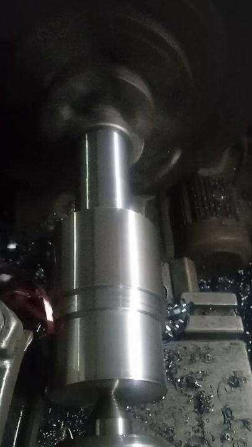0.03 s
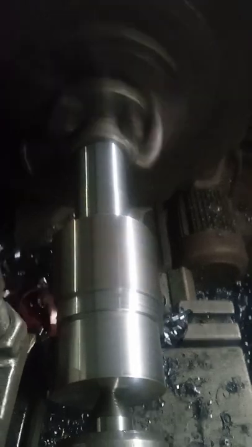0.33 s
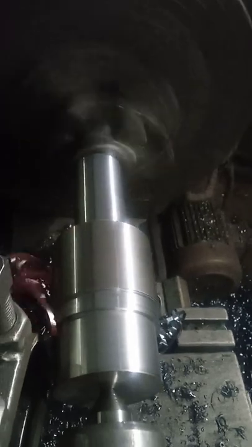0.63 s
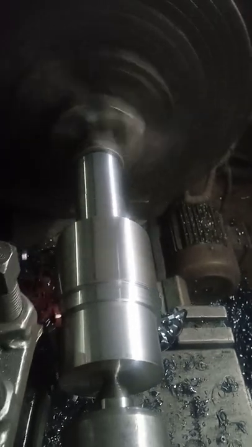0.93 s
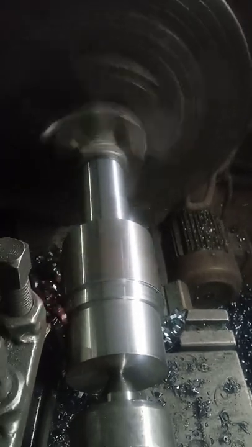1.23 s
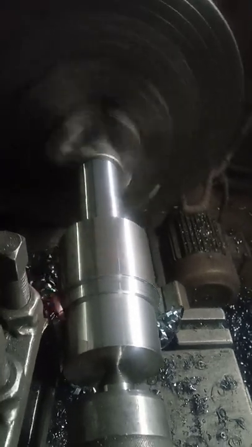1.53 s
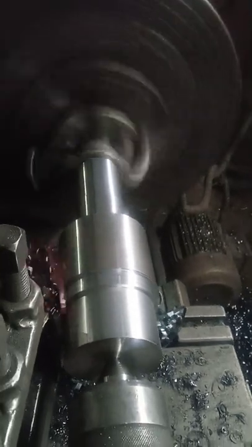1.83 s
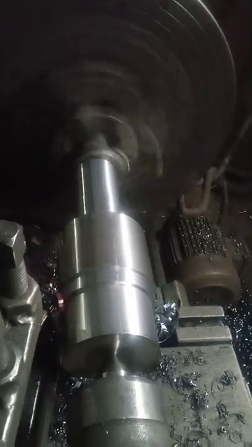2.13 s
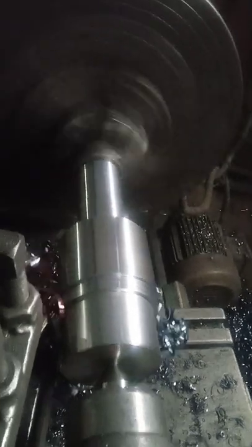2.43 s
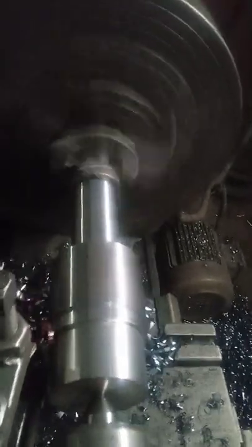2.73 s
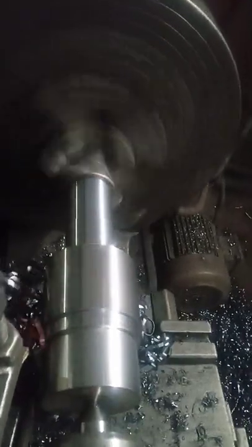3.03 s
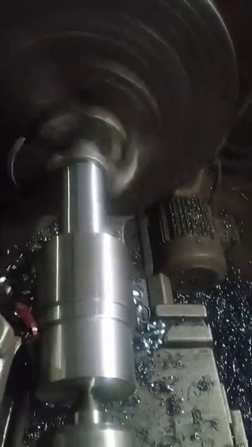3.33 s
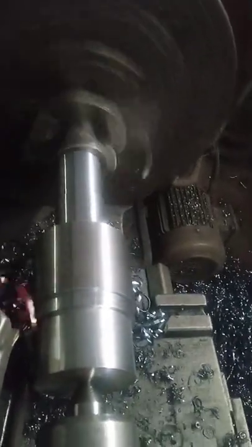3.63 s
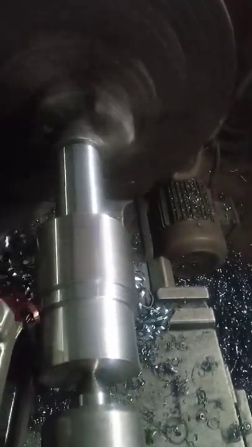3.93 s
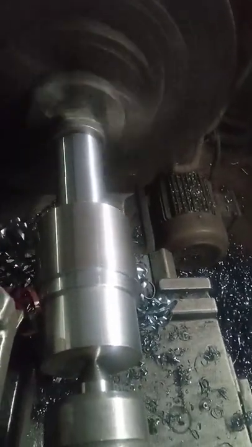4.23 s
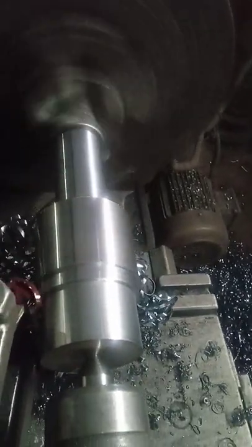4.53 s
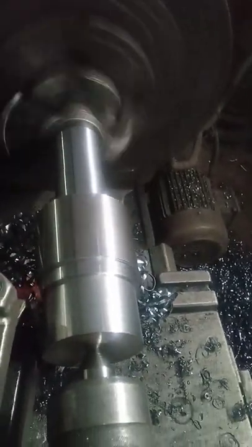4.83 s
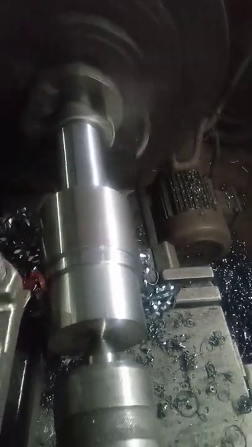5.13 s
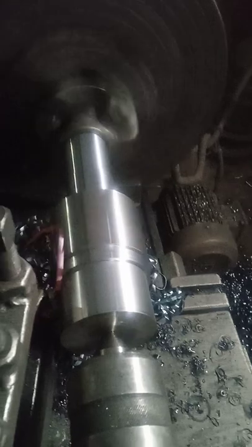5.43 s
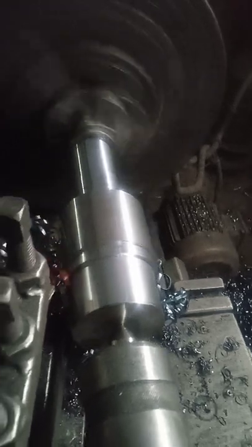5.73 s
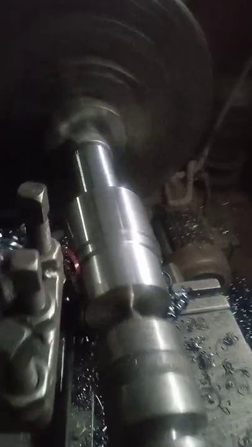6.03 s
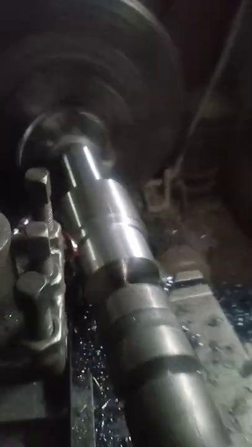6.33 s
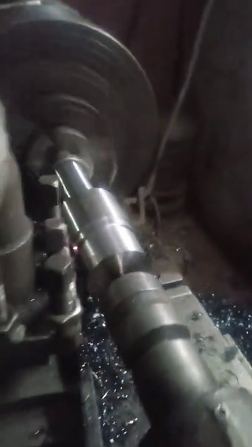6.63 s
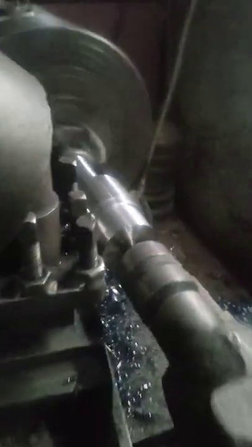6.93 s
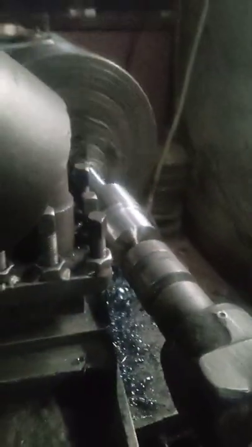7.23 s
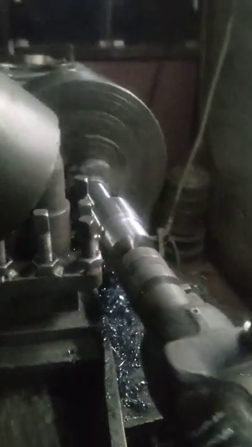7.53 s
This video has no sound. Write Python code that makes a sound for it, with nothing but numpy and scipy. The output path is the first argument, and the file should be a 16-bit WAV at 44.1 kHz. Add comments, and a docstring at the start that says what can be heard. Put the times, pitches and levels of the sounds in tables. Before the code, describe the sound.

A lathe cuts a steel shaft close to the microphone in a workshop. The tool gives a piercing, high squeal that keeps faltering and coming back, while the peeling metal hisses and rings, with a few short scrapes. Underneath, the drive rumbles with a faint gear whine and surges about every second and a half. Near the end, a moving hand makes a few soft bumps on the microphone.

```python
"""A lathe cuts a steel shaft close by, and its shaking tool gives a piercing squeal.
The squeal falters and rises in pitch whenever the chip (the peeled-off metal) loses its grip.
The sliding chip hisses and makes the steel ring, with a few short scrapes. Underneath, the drive
rumbles, its gears sing, and it surges about every second and a half.
Near the end a moving hand gives the microphone a few soft bumps."""
import sys
import numpy as np
from scipy.fft import rfft, irfft, next_fast_len
from scipy.io import wavfile
from scipy.ndimage import uniform_filter1d, map_coordinates

SR = 44100
rng = np.random.default_rng(int(sys.argv[2]) if len(sys.argv) > 2 else 0)


def materialize(psi):
    """Save the field psi as 16-bit PCM at rate SR to the path in sys.argv[1].

    A 1-D psi becomes a single channel; in a 2-D psi each row is a channel.
    """
    bounded = np.clip(np.atleast_2d(psi).T, -1, 1)
    quanta = np.round(bounded * 32767).astype(np.int16)
    wavfile.write(sys.argv[1], SR, quanta)


N = 338247
T = np.arange(N) / SR


def amp(db):
    """Turn decibels into a gain."""
    return 10 ** (np.asarray(db) / 20)


def unit(x):
    """Scale a signal to an average strength (rms) of 1."""
    return x / np.sqrt(np.mean(np.abs(x) ** 2) + 1e-20)


def curves(rows):
    """Join a table's rows with straight lines: one curve for each column after the time."""
    times, *columns = np.transpose(rows)
    return [np.interp(T, times, column) for column in columns]


def wobble(per_s):
    """A smooth random curve of strength 1, through per_s random points a second."""
    coarse_s = T[::16]
    smooth = map_coordinates(rng.standard_normal(4096), [coarse_s * per_s], mode="wrap")
    return np.interp(T, coarse_s, unit(smooth))


def swell(peak_s, length_s):
    """A bell curve that reaches 1 at peak_s and is length_s wide at half height."""
    return np.exp(-np.log(2) * np.minimum(2 * np.abs(T - peak_s) / length_s, 10) ** 2)


def surge(peak_s, fall_s, rise_s=0.04):
    """A quick rise to 1 at peak_s, then a slower fall."""
    return np.where(T < peak_s, swell(peak_s, 2 * rise_s), np.exp(-np.abs(T - peak_s) / fall_s))


def filtered(x, gain_at):
    """Turn each frequency in x up or down by gain_at(hz)."""
    size = next_fast_len(N + 8192)
    return irfft(rfft(x, size) * gain_at(np.fft.rfftfreq(size, 1 / SR)), size)[:N]


def noise(spectrum):
    """Noise of strength 1, shaped by rows of frequency_hz, relative_db."""
    points_hz, db = np.transpose(spectrum)
    white = rng.standard_normal(N)
    return unit(filtered(white, lambda hz: amp(np.interp(np.log(hz + 1), np.log(points_hz), db))))


def ringing(pitch_hz, width_hz):
    """Noise of strength 1 in a narrow band, so that it rings around one pitch."""
    size = next_fast_len(N)
    hz = np.fft.rfftfreq(size, 1 / SR)
    white = rng.standard_normal(len(hz)) + 1j * rng.standard_normal(len(hz))
    return unit(irfft(white / (1 + ((hz - pitch_hz) / width_hz) ** 2), size)[:N])


def tone(pitch_hz, rough, per_s):
    """A tone of strength 1 that flutters more as rough grows."""
    phase = 2 * np.pi * np.cumsum(pitch_hz * np.ones(N)) / SR
    wave = (np.sqrt(2) + rough * wobble(per_s)) * np.cos(phase)
    wave += rough * wobble(per_s) * np.sin(phase)
    return wave / np.sqrt(1 + rough ** 2)


# Moments when the chip slips: peak_s, share_lost (0 to 1), length_s
CHIP_SLIPS = [(0.476, 0.52, 0.02), (0.514, 0.47, .021), (0.714, 0.5, 0.04), (0.859, 0.83, 0.021),
              (0.937, 1, 0.012), (1.361, 0.97, 0.018), (1.445, 0.58, 0.033), (1.583, 0.62, 0.027),
              (1.64, 1, 0.01), (1.839, .8, 0.015), (1.934, 0.98, 0.031), (2.095, 0.73, 0.0082),
              (2.129, 0.6, 0.022), (2.515, 0.54, 0.071), (2.604, 0.74, 0.022), (2.973, 0.95, 0.023),
              (3.026, 0.87, 0.021), (3.659, 0.66, 0.041), (3.85, 0.7, 0.022), (3.89, 0.7, 0.023),
              (3.948, 0.63, .023), (4.042, 0.75, 0.029), (4.344, 1, 0.033), (4.601, 0.48, 0.036),
              (5.095, 0.67, 0.059), (5.351, 0.59, 0.047), (5.438, 0.56, 0.032), (5.605, .77, 0.021),
              (5.801, 0.81, 0.0081), (6.081, 0.7, 0.015), (6.379, 0.88, 0.01), (6.509, 0.84, 0.089),
              (6.758, 0.83, 0.033), (7.505, 0.85, 0.031)]


def chip_grip(slips_per_s=15, typical_loss=0.276, typical_length_s=0.0218):
    """How well the chip grips: around 1, dipping at the listed slips and at small random ones."""
    small_slips = [((k + late) / slips_per_s, typical_loss * 2 * deep, typical_length_s * (.5 + long))
                   for k, (late, deep, long) in enumerate(rng.uniform(size=(256, 3)))]
    grip = np.ones(N)
    for peak_s, share_lost, length_s in CHIP_SLIPS + small_slips:
        if peak_s < T[-1]:
            grip *= 1 - min(share_lost, .9) * swell(peak_s, length_s)
    return grip / np.sqrt(uniform_filter1d(grip ** 2, size=9000))  # even out over about 0.2 s


# The shaking of the tool: time_s, pitch_hz, level_db
TOOL_SHAKE = [(0.34, 5597, -12.0), (0.64, 5601, -12.5), (1.37, 5617, -22.5), (1.58, 5594, -22.0),
              (1.69, 5593, -15.0), (2.12, 5621, -18.0), (2.27, 5599, -14.5), (2.54, 5601, -22.5),
              (2.87, 5596, -16.5), (3.16, 5654, -28.0), (3.29, 5666, -18.0), (3.5, 5605, -12.5),
              (3.81, 5605, -17.0), (3.88, 5636, -17.0), (4.01, 5610, -17.5), (4.32, 5650, -26.0),
              (4.39, 5655, -20.5), (4.46, 5625, -25.0), (4.88, 5600, -17.5), (5.11, 5635, -18.5),
              (5.78, 5595, -14.0), (5.89, 5618, -16.0), (6.16, 5605, -13.5), (6.71, 5604, -23.0),
              (6.84, 5624, -18.0), (6.97, 5608, -31.5), (7.1, 5646, -25.0), (7.25, 5657, -28.0),
              (7.52, 5595, -17.5), (7.65, 5623, -15.5)]
# The squeal's overtone, one octave up: time_s, level_db
SQUEAL_OCTAVE = [(0.34, -46), (1.15, -39.5), (2.4, -47), (2.67, -33), (3.24, -63), (3.47, -53), (4.4, -51),
                 (5.67, -36), (5.84, -42), (6.29, -32.5), (6.4, -46), (6.57, -32), (6.74, -56), (6.99, -45),
                 (7.1, -59), (7.65, -47)]


def squeal(waver_hz=9, spring_hz=37.88, limit_db=-12.5):
    """The cut makes the tool shake; with less grip it swings less and springs up in pitch."""
    base_hz, level_db = curves(TOOL_SHAKE)
    octave_db, = curves(SQUEAL_OCTAVE)
    grip = chip_grip()
    waver = waver_hz * np.maximum(wobble(8), -1)  # the chip thickens and thins
    pitch_hz = base_hz + waver + spring_hz * (1 - grip) + 3 * wobble(110)
    rough = np.clip(0.18 * amp(-1.1 * (level_db + 17)), 0, .45)  # strong is clean, weak stutters
    swing = amp(level_db - 1.76) * grip
    swing /= (1 + (swing / amp(limit_db)) ** 8) ** (1 / 8)  # the tool can only swing so far
    main_tone = swing * tone(pitch_hz, rough, per_s=125)
    octave_gain = amp(octave_db + 0.1 + 1.95 * wobble(22)) * grip
    return main_tone + octave_gain * tone(2 * pitch_hz, rough=0.48, per_s=110)


# The chip sliding over the tool: time_s, level_db
CHIP_LEVELS = [(0.4, -37.5), (1.2, -34.5), (2.1, -34.5), (3.3, -35.5), (5.1, -35), (6.4, -36), (7.1, -38.5),
               (7.67, -39.5)]
# The notes at which tool, holder and shaft ring: pitch_hz, width_hz, relative_db
STEEL_NOTES = [(4083, 80, -9), (5210, 53, 0.5), (5337, 51, 0), (5595, 70, 10), (6010, 150, -1),
               (6617, 51, -3.5), (6944, 120, -9.5), (8710, 60, -17.5), (9400, 160, -20.5), (11600, 18, -25),
               (10875, 48, -15), (11400, 120, -12)]
# The chip's hiss: frequency_hz, relative_db
HISS_SPECTRUM = [(2500, -44), (4000, -4), (5000, -8), (6300, 6), (7300, -1), (8300, -7.5), (10000, -12.5),
                 (11300, -7.5), (12700, -14), (14000, -16), (14300, -7), (14750, -2.5), (15700, -4)]


def chip(ring_db=3.5, hiss_db=-8):
    """The chip tears off unevenly and hisses; each note of the steel grows and fades on its own."""
    level_db, = curves(CHIP_LEVELS)
    tearing = amp(0.42 * wobble(35) + 0.8 * wobble(260))
    notes = sum(amp(db + 2.14 * wobble(3.33) + 2.8 * wobble(22)) * ringing(pitch_hz, width_hz)
                for pitch_hz, width_hz, db in STEEL_NOTES)
    ring = amp(level_db + ring_db) * unit(notes)
    hiss = amp(level_db + hiss_db + .8 * wobble(3)) * noise(HISS_SPECTRUM)
    return tearing * (ring + hiss)


# The running drive: time_s, level_db
DRIVE_LEVELS = [(0.4, -41), (1.2, -37.5), (1.8, -39), (2.3, -37.5), (3.0, -37), (3.6, -38.5), (4.6, -38),
                (5.1, -36.5), (5.65, -40.5), (6.15, -42.5), (6.4, -37), (7.1, -38), (7.67, -40)]
# Once a cycle the drive binds and surges: peak_s, rumble_rise_db, rub_rise_db, rumble_fall_s
DRIVE_SURGES = [(1.245, 8, 3.5, 0.23), (2.775, 3.5, 2.5, 0.088), (4.3, 5.5, 5.5, 0.091),
                (5.845, 9, 7, 0.19), (7.385, 9.5, 7.5, 0.26)]
# The drive's low rumble: frequency_hz, relative_db
RUMBLE_SPECTRUM = [(25, -42), (48, -36), (65, -28), (90, -8), (125, -10), (175, 0), (220, -1), (290, 2),
                   (420, 0), (560, 0.5), (680, -13.5), (1200, -36), (3000, -45)]
# The drive's brighter rubbing: frequency_hz, relative_db
RUB_SPECTRUM = [(300, -37), (650, -2.5), (820, 1.5), (1100, -1), (1450, -1), (1900, -6.5), (2200, -2.5),
                (2700, -8), (3300, -9.5), (3800, -14), (5000, -14.5), (8000, -29), (14000, -42)]
# Wavering tones of gears and bearings: pitch_hz, relative_db
GEAR_TONES = [(88, -31.5), (139, -25), (175, -25), (283, -18), (360, -16), (406, -15), (527, -12),
              (563, -17), (635, -19), (802, -21.5), (1020, -18.5), (1055, -16.5), (1127, -18.5),
              (1174, -20), (1230, -24.5), (1303, -22.5), (1445, -17.5)]


def drive(cycle_s=1.535, heaviest_s=1.34, gears_db=2.3):
    """The drive rumbles and rubs harder as its load comes round; gear tones come and go."""
    level_db, = curves(DRIVE_LEVELS)
    turn = 2 * np.pi * (T - heaviest_s) / cycle_s
    load = np.cos(turn) + np.cos(2 * turn)  # a second, lighter load halfway round
    rumble_db = -0.3 + 0.45 * load
    rub_db = -2 + 0.5 * load
    for peak_s, rumble_rise_db, rub_rise_db, fall_s in DRIVE_SURGES:
        rumble_db += rumble_rise_db * surge(peak_s, fall_s)
        rub_db += rub_rise_db * surge(peak_s, 0.58 * fall_s)  # the rubbing dies down sooner
    rattle = amp(1.27 * wobble(55) + 0.56 * wobble(9))
    rumble = amp(rumble_db + 1.3 * wobble(20)) * noise(RUMBLE_SPECTRUM)
    rub = amp(rub_db) * noise(RUB_SPECTRUM)
    gears = sum(amp(gears_db + db + 3.8 * wobble(5)) * tone(pitch_hz, rough=2.2, per_s=32)
                for pitch_hz, db in GEAR_TONES)
    return amp(level_db) * (rattle * (rumble + rub) + gears)


# Moments when the clearest gear sings out: peak_s, length_s, level_db
WHINE_SWELLS = [(0.824, 0.11, -56), (1.424, 0.37, -46), (2.24, 0.18, -50), (3.604, 0.13, -51),
                (4.2, 0.22, -49.5), (5.307, 0.096, -46), (5.922, 0.13, -43.5), (7.33, 0.39, -45.5)]


def gear_whine(pitch_hz=1805, resting_db=-55):
    """Gear teeth meeting make a faint, steady whine that swells now and then."""
    swells = sum(amp(db) * swell(peak_s, length_s) for peak_s, length_s, db in WHINE_SWELLS)
    return (amp(resting_db) + swells) * tone(pitch_hz + 5 * wobble(5), rough=1.9, per_s=45)


# Moments when the metal rings out: peak_s, length_s, pitch_hz, width_hz, level_db
METAL_RINGS = [(0.452, 0.12, 6590, 45, -42), (0.76, .14, 7700, 40, -47), (2.054, 0.97, 6600, 50, -45),
               (2.75, 0.4, 5260, 44.4, -33.5), (2.802, 0.29, 6950, 68.5, -43.5),
               (3.009, .2, 2250, 70.3, -45.5), (3.153, 0.27, 1110, 50.1, -40.5),
               (3.75, 0.17, 5220, 39.6, -35), (3.788, 0.33, 2250, 50.5, -50), (4.549, 1, 6880, 107.5, -43),
               (4.883, 0.13, 5200, 40.76, -35), (5.846, 0.081, 846, 129.7, -33.5),
               (5.958, 0.25, 4345, 70.9, -51), (6.081, .1, 6540, 50, -40), (6.423, 0.35, 14700, 699, -54),
               (6.9, .16, 4235, 69.8, -51), (7.38, 0.084, 6564, 49.34, -43), (7.594, .15, 2197, 34.65, -44),
               (7.65, 0.14, 1270, 40, -43)]


def metal_rings():
    """Now and then rubbing feeds one note of the metal until it sings out."""
    return sum(amp(db) * swell(peak_s, length_s) * ringing(pitch_hz, width_hz)
               for peak_s, length_s, pitch_hz, width_hz, db in METAL_RINGS)


# Short, bright scrapes: peak_s, length_s, level_db
SCRAPE_SWELLS = [(0.71, .07, -41), (1.226, 0.19, -42), (2.77, 0.044, -38), (5.86, 0.15, -51),
                 (7.39, .12, -33)]
# The noise of a scrape: frequency_hz, relative_db
SCRAPE_SPECTRUM = [(200, -21), (450, -3), (1500, 4), (3000, 1.5), (5000, -2), (7000, -2), (10000, -32),
                   (15000, -36)]


def scrapes():
    """Something rubs in passing and makes a short, gritty swell."""
    pressure = sum(amp(db) * swell(peak_s, length_s) for peak_s, length_s, db in SCRAPE_SWELLS)
    grit = amp(0.93 * wobble(180))
    return pressure * grit * noise(SCRAPE_SPECTRUM)


# The hand moving the microphone: time_s, level_db
HAND_LEVELS = [(5.8, -81), (6.45, -46), (7.1, -47), (7.45, -46), (7.67, -60)]
# The hand's dull rumble: frequency_hz, relative_db
HAND_SPECTRUM = [(25, -16), (50, -13), (70, -7), (170, 10), (300, -27), (700, -38), (2000, -77)]
# Soft bumps on the microphone: middle_s, level_db, pitch_hz
HAND_BUMPS = [(6.964, -21, 198), (7.064, -35, 102.6), (7.098, -20, 168.6), (7.144, -36, 95),
              (7.499, -22, 198.4)]


def hand_on_microphone():
    """The moving hand rumbles softly; each bump is one low push and its rebound."""
    level_db, = curves(HAND_LEVELS)
    sound = amp(level_db + 2.3 * wobble(27)) * noise(HAND_SPECTRUM)
    for middle_s, db, pitch_hz in HAND_BUMPS:
        wave = np.sin(2 * np.pi * pitch_hz * (T - middle_s))
        sound -= amp(db) * wave * swell(middle_s, 1.05 / pitch_hz)
    return sound


def scene():
    """The cut, the machine and the hand, added into one channel."""
    cutting = squeal() + chip() + metal_rings()
    machine = drive() + gear_whine()
    return (cutting + machine + scrapes() + hand_on_microphone())[None]


def record(dry):
    """After a moment of silence the sound fades in; the very highest treble is cut off."""
    start_s, fade_s, start_gain, top_hz = 0.078, 0.33, 0.06, 15750
    fade_in = (T > start_s) * np.clip(start_gain + (T - start_s) / fade_s, 0, 1)
    return filtered(dry[0] * fade_in, lambda hz: hz < top_hz)[None]


dry = scene()
out = record(dry)
materialize(out)
```